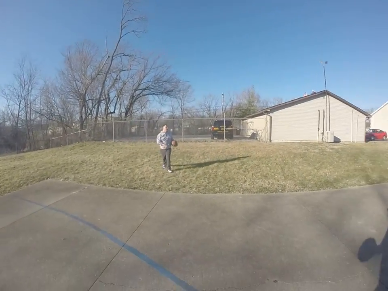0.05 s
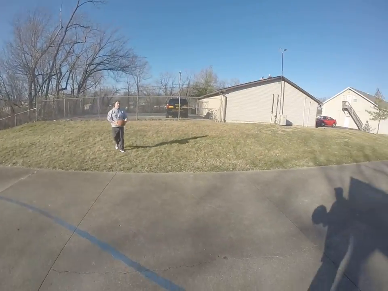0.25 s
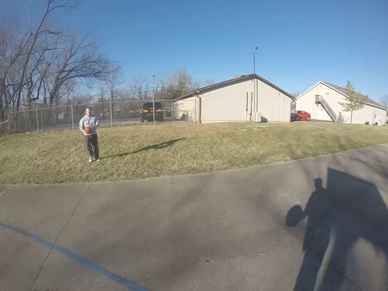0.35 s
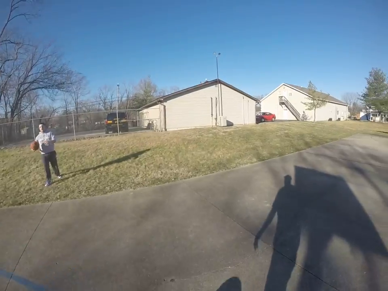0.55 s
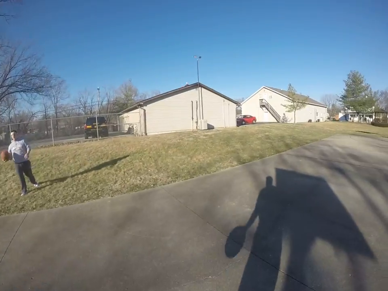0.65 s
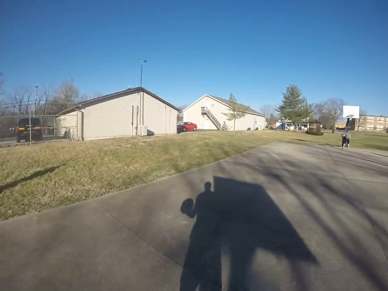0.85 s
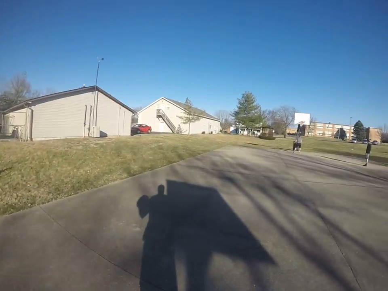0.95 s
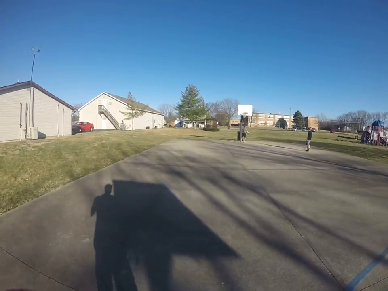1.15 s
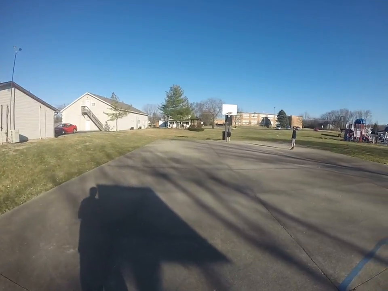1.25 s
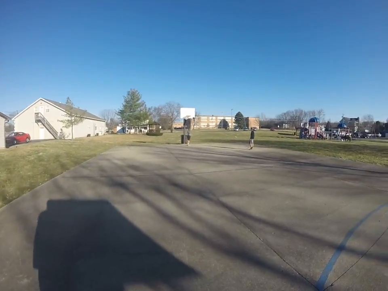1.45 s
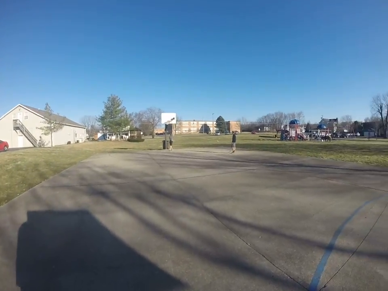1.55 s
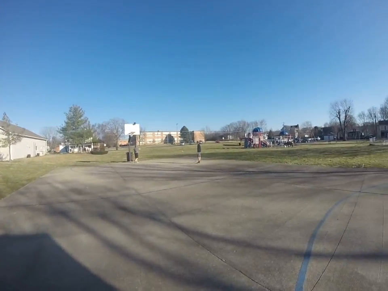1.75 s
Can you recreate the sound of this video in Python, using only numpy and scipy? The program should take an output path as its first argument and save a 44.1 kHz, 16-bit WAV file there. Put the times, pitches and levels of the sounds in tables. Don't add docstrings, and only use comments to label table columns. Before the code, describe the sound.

A basketball bounces twice on an outdoor paved court, with dull handling bumps and low wind.

```python
import sys
import numpy as np
from scipy import signal
from scipy.io import wavfile

SR = 44100
rng = np.random.default_rng(int(sys.argv[2]) if len(sys.argv) > 2 else 0)


def wav_record(signal):
    frames = np.transpose(np.atleast_2d(signal))
    bounded = np.clip(frames, -1, 1)
    quanta = np.round(bounded * 32767).astype(np.int16)
    wavfile.write(sys.argv[1], SR, quanta)


def field_ratio(decibels):
    return 10 ** (np.asarray(decibels, dtype=float) / 20)


N = 79380


def since(start_s):
    return np.maximum(np.arange(N) / SR - start_s, 0)


def ring(start_s, db, hz, t60_s, rise_cycles):
    t = since(start_s)
    rise = 1 - np.exp(-(t * hz / rise_cycles) ** 2)
    return field_ratio(db - 60 * t / t60_s) * np.sin(2 * np.pi * hz * t) * rise


def rms_one(x):
    return x / np.sqrt(np.mean(x ** 2) + 1e-20)


def noise_at(hz, octaves):
    edges_hz = np.clip(hz * 2 ** (np.array([-.5, .5]) * octaves), 20, 19000)
    sos = signal.butter(3, edges_hz, "band", fs=SR, output="sos")
    return rms_one(signal.sosfilt(sos, rng.standard_normal(N)))


def drift(rate_hz):
    pole = np.exp(-80 * np.pi * rate_hz / SR)
    white = rng.standard_normal(N // 40 + 2002)
    slow = signal.lfilter([1], [1, -2 * pole, pole * pole], white)[2000:]
    return np.interp(np.arange(N) / 40, np.arange(len(slow)), rms_one(slow))


def bands(noise_rows, low_hz, high_hz, per_octave):
    edges_hz = low_hz * 2 ** np.arange(0, np.log2(high_hz / low_hz) + .01, 1 / per_octave)
    for k, (a, b) in enumerate(zip(edges_hz, edges_hz[1:])):
        sos = signal.butter(2, [a, b], "band", fs=SR, output="sos")
        yield np.sqrt(a * b), signal.sosfilt(sos, noise_rows[k % 2])


def coloured(spectrum, low_hz, high_hz, shared_db, own_db, rate_hz):
    hz, db = np.transpose(spectrum)
    settle = 8000
    out, together = 0, drift(rate_hz / 4)
    for centre_hz, band in bands(rng.standard_normal((2, N + settle)), low_hz, high_hz, 4):
        level_db = np.interp(np.log(centre_hz), np.log(hz), db)
        flicker_db = shared_db * together + own_db * drift(rate_hz)
        out = out + field_ratio(level_db + flicker_db) * band[settle:]
    return rms_one(out)


def puffs(rows):
    out = 0
    for start_s, db, length_s, hz, octaves in rows:
        u = 3 * since(start_s) / length_s
        shape = u * np.exp(1 - u)
        puff = shape * noise_at(hz, octaves)
        out = out + field_ratio(db) * puff * np.sqrt(np.sum(shape ** 2) / np.sum(puff ** 2))
    return out


def bounce(k):
    # (time [s], level [dB], contact [s], lift-off kick [dB])
    bounce_rows = [
        (0.6094, -1.5, 0.0109, -4),
        (1.498, -1, 0.01067, -3),
    ]
    touch_s, db, contact_s, kick_db = bounce_rows[k]
    hit_s = touch_s + 0.00018
    out = ground_slap(touch_s, hit_s) + thump(k, hit_s, contact_s)
    out = out + ball_modes(k, hit_s, contact_s, kick_db) + skin_fold(k, hit_s)
    out = out + housing_ring(k, hit_s) + cavity(k, hit_s, contact_s)
    out = out + lift_snap(k, hit_s, contact_s) + tails(k, hit_s)
    return field_ratio(db) * out


def ground_slap(touch_s, hit_s):
    slap_hz = 2350 / 2
    return ring(hit_s, -8.5, slap_hz, 0.0048, 0.092) - ring(touch_s, -7.5, slap_hz, 0.0023, 0.18)


def thump(k, hit_s, contact_s):
    start_hz, end_hz, sag_s = (265, 279)[k], 96.4, 0.0028
    release_s, attack_s = 0.0016, 0.00086
    t = since(hit_s)
    turns = end_hz * t + (start_hz - end_hz) * sag_s * (1 - np.exp(-t / sag_s))
    release = np.exp(-(since(hit_s + contact_s - .0013) / release_s) ** 2)
    attack = 1 - np.exp(-(t / attack_s) ** 2)
    return field_ratio(-4.5) * np.sin(2 * np.pi * turns) * release * attack


def ball_modes(k, hit_s, contact_s, kick_db):
    # (pitch [Hz], first bounce [dB], second bounce [dB], lift-off [dB], t60 [s])
    ball_rows = [(441, -2, -7.5, 0, 0.019), (644, -11, -6, -21, 0.041), (722, -28, -16.5, -20.5, 0.052),
                 (895, -1, -13.5, -25, 0.014), (1390, -27, -19.5, -27, 0.025),
                 (2144, -5.5, -13.5, -25.5, 0.0078), (3130, -45, -38, -34, 0.0056)]
    lift_s = hit_s + contact_s - .0008
    out = 0
    for hz, *hit_db, lift_db, t60_s in ball_rows:
        out = out + ring(hit_s, hit_db[k], hz, t60_s, 0.2)
        out = out - ring(lift_s, lift_db + kick_db, hz, t60_s, 0.17)
    return out


def skin_fold(k, hit_s):
    # (pitch [Hz], first bounce [dB], second bounce [dB], t60 [s])
    fold_rows = [(403, -2.5, 2, 0.027), (534, 1, -49, 0.016), (625, -26, -15, 0.1), (840, -38, -4.5, 0.017)]
    delay_s, fold_db = (0.002977, 0.002515)[k], (-3, -8)[k]
    return -sum(ring(hit_s + delay_s, db[k] + fold_db, hz, t60_s, 0.11) for hz, *db, t60_s in fold_rows)


def housing_ring(k, hit_s):
    # (pitch [Hz], first bounce [dB], second bounce [dB], t60 [s])
    housing_rows = [(2033, -12, -58, 0.024), (2267, -16, -43, 0.014), (3076, -15, -13.5, 0.01),
                    (3200, -17, -20.5, 0.01), (3530, -23, -26, 0.042), (4990, -47, -12.5, 0.016),
                    (5520, -21, -16, 0.026), (6120, -27, -16.5, 0.016), (6560, -33.5, -24.5, 0.015),
                    (7110, -37, -42, .01), (8000, -34.5, -34, 0.011), (9300, -36, -43, 0.01),
                    (12800, -58, -57, .005)]
    hold_s, steepness = (0.0037, 0.0023)[k], (3.3, 2.6)[k]
    t = since(hit_s)
    out = 0
    for hz, *db, t60_s in housing_rows:
        haste = max(hz / 6200, 1) ** 1.6
        damping = np.exp(-(t / hold_s * haste) ** steepness)
        out = out + ring(hit_s - .0002, db[k], hz, 2 * t60_s, 1.0) * damping
    return out


def cavity(k, hit_s, contact_s):
    # (pitch [Hz], first bounce [dB], second bounce [dB], t60 [s])
    cavity_rows = [(1050, -46, -40, .14), (2750, -44, -56, .2), (3250, -56, -47, .2), (5300, -66, -65, .2),
                   (6300, -65, -65, .2), (6850, -67, -65, .2)]
    on = since(hit_s) > contact_s
    t = since(hit_s + contact_s)
    return sum(on * field_ratio(db[k] - 60 * t / t60_s) * noise_at(hz, .05) for hz, *db, t60_s in cavity_rows)


def lift_snap(k, hit_s, contact_s):
    return -ring(hit_s + contact_s - .0009, (-14, -19)[k], 2160, 0.0053, 0.95)


def tails(k, hit_s):
    t = since(hit_s)
    middle_db = (-38, -39)[k] - 60 * t / 0.084 + 5.8 * drift(60.0)
    bright_db = (-41, -49)[k] - 60 * t / (0.083, 0.18)[k] + 1.6 * drift(60.0)
    low_db = -45 - 60 * t / 0.19
    out = field_ratio(middle_db) * noise_at(2850, 1500 / 2850 * 2.05)
    out = out + field_ratio(bright_db) * noise_at(5420.0, 0.56) + field_ratio(low_db) * noise_at(855, 0.94)
    return (t > 0) * out


def hand():
    # (pitch [Hz], level [dB], t60 [s])
    hand_rows = [(530, -18, 0.014), (950, -55, .012), (1510, -19, 0.012), (2250, -19, 0.01),
                 (2570, -12, 0.0047), (3000, -15, 0.0082), (3860, -26.5, 0.0092), (4270, -42, 0.0071),
                 (5700, -37, 0.0084), (7050, -46, 0.011)]
    hand_s, hold_s = .4231, 0.0042
    damping = np.exp(-(since(hand_s) / hold_s) ** 3)
    return damping * sum(ring(hand_s, db, hz, t60_s, 0.4) for hz, db, t60_s in hand_rows)


def through_seal(x):
    dip_share = 0.97
    dipped = signal.lfilter(*signal.iirnotch(4620, 2.22, fs=SR), x)
    sos = signal.butter(2, 9000, fs=SR, output="sos")
    return signal.sosfilt(sos, dip_share * dipped + (1 - dip_share) * x)


def knocks():
    # (time [s], level [dB], pitch [Hz], t60 [s])
    knock_rows = [(0.4333, -15, 757, 0.011), (.4355, -14, 580, 0.011), (0.435, -30, 1760, .008),
                  (0.467, -17.5, 105, 0.077), (1.1314, -12.5, 630, 0.0098), (1.132, -36, 384, 0.0071)]
    return sum(ring(*row, 0.44) for row in knock_rows)


def bumps():
    # (time [s], level [dB], pitch [Hz], t60 [s])
    bump_rows = [(0.229, -7, 40.6, 0.038), (0.273, -2, 70, 0.024), (0.301, -12.5, 49, 0.078),
                 (0.325, -13.5, 45, 0.063), (0.348, -15.5, 115, 0.044), (0.366, -25, 157, 0.058),
                 (.385, -19, 137.5, 0.084), (.407, -7, 70.5, 0.022), (0.425, -11.5, 94, 0.038),
                 (0.844, -22.5, 38.7, 0.22), (0.911, -33.5, 84.6, 0.26), (1.362, -53, 89, 0.03),
                 (1.526, -30.5, 98.4, 0.32), (1.55, -39, 111, 0.11), (1.577, -16.5, 65, 0.048),
                 (1.648, -32, 80, 0.094)]
    return -sum(ring(*row, 0.19) for row in bump_rows)


def scuffs():
    # (time [s], level [dB], length [s], centre [Hz], width [octaves])
    scuff_rows = [(0.036, -55, 0.0057, 3000, 0.52), (0.19, -65, 0.0065, 9800, 0.41),
                  (.184, -60, 0.0072, 6500, 0.24), (.198, -63.5, 0.0055, 9900, 0.43),
                  (0.199, -53.5, 0.0064, 3200, 0.73), (.279, -57, .004, 5500, 0.51),
                  (.434, -37.5, 0.0067, 2330, 1), (0.4678, -39, 0.005, 2560, 0.49),
                  (.475, -59, 0.0035, 5470, 1.2), (0.479, -50, 0.0065, 2380, 0.44),
                  (0.483, -67, .008, 5950, 0.76), (0.686, -48, 0.013, 2600, 0.55),
                  (0.913, -57.5, 0.012, 5140, 0.21), (0.922, -67, 0.0055, 8000, 1.1),
                  (1.105, -31, 0.008, 782, 0.13), (1.1072, -51, 0.0051, 2540, 1),
                  (1.190, -49.5, 0.0076, 1810, 1.1), (1.353, -56, 0.0097, 5140, 0.65),
                  (1.357, -73, 0.011, 8500, .8), (1.574, -64, 0.004, 6500, 0.81),
                  (1.5832, -47, 0.0041, 4630, 0.94), (1.679, -47, 0.0067, 1700, 1.8)]
    return puffs(scuff_rows)


def rubs():
    # (time [s], level [dB], length [s], centre [Hz], width [octaves])
    rub_rows = [(.229, -36, 0.0099, 327, 0.44), (.277, -40, 0.013, 600, 0.75),
                (.292, -38, 0.0079, 650, 0.5), (.312, -31.5, .014, 380, 0.94),
                (.33, -34.5, 0.017, 423, 0.38), (.346, -41, 0.01, 367, 0.64), (.363, -42, 0.009, 647, 0.22),
                (.394, -43, 0.0068, 590, 0.43), (.427, -52, .012, 2510, 0.9), (.443, -59, 0.01, 2500, 0.41),
                (.457, -56, 0.012, 2300, 0.72), (.468, -43, 0.0088, 1150, 0.58),
                (.725, -50, 0.022, 764, .6), (.775, -42.5, 0.028, 756, 0.44),
                (.853, -37.5, 0.02, 407, 0.77), (.866, -42, 0.015, 776, 0.74),
                (1.099, -37, 0.006, 740, 0.51), (1.111, -49.5, 0.0061, 1280, 0.95),
                (1.145, -39, 0.0065, 720, 0.44), (.286, -35, 0.0079, 230, 0.5),
                (.322, -31, 0.0091, 240, 0.63), (.353, -28, 0.013, 218, 0.67),
                (.376, -44, 0.019, 296, 0.66), (1.106, -41, 0.017, 470, 0.91),
                (.436, -48, 0.0045, 3260, 0.67), (1.107, -58, .006, 5470, 0.6),
                (.30, -35, 0.021, 150, 0.55), (.337, -36.5, 0.023, 172, .7),
                (1.53, -60.5, 0.049, 5600, 0.37), (1.513, -54, 0.0041, 3000, .5),
                (1.521, -55, 0.0041, 3360, 0.85), (1.536, -52, .008, 3200, .4)]
    return puffs(rub_rows)


def wind():
    # (time [s], level [dB])
    gust_curve = [(0, -53.5), (.2, -42), (.24, -31.5), (.32, -26.5), (.39, -31), (.48, -35.5), (.58, -40),
                  (0.699, -36), (.82, -46.5), (.86, -38.5), (.93, -44.5), (1.2, -42.5), (1.37, -37),
                  (1.47, -40), (1.53, -40), (1.6, -42.5), (1.68, -47), (1.8, -48)]
    # (frequency [Hz], density [dB per Hz])
    wind_spectrum = [(15, -13), (40, 0), (90, -4), (170, -6.5), (350, -18.5), (700, -21.5), (1200, -71)]
    gust_db = np.interp(np.arange(N) / SR, *np.transpose(gust_curve))
    return field_ratio(gust_db) * coloured(wind_spectrum, 15, 1300, shared_db=1.5, own_db=2.0, rate_hz=25.0)


def hum():
    # (frequency [Hz], density [dB per Hz])
    hum_spectrum = [(25, -2), (85, 0), (200, -8), (450, -9.5), (780, -8.5), (1200, -26), (1900, -29.5),
                    (2900, -24)]
    # (time [s], level [dB])
    swell_curve = [(0, 1.5), (.15, 2), (.4, .5), (.75, 2), (.88, 0), (1.0, 0), (1.3, -1.5), (1.55, 2),
                   (1.8, 0.5)]
    swell_db = np.interp(np.arange(N) / SR, *np.transpose(swell_curve))
    return field_ratio(swell_db - 40) * coloured(hum_spectrum, 20, 2900, shared_db=.4, own_db=.9, rate_hz=20.0)


def hiss():
    # (frequency [Hz], density [dB per Hz])
    hiss_spectrum = [(2900, 0), (4000, -11.5), (4700, -7), (5600, -11.5), (6700, -17), (7500, -20),
                     (12500, -26.5), (15500, -49.5)]
    floor = field_ratio(-63) * coloured(hiss_spectrum, 2900, 17000, shared_db=.3, own_db=.9, rate_hz=20.0)
    port = field_ratio(-65 + 1.8 * drift(20.0)) * noise_at(2810, 0.16)
    ridge = field_ratio(-80) * noise_at(6500, 0.11)
    whistle = field_ratio(-72.5 + 2.0 * drift(26.0)) * noise_at(4713, 0.12)
    return floor + port + ridge + whistle


def scene():
    blows = through_seal(bounce(0) + bounce(1) + hand())
    contacts = knocks() + bumps() + scuffs() + rubs()
    return (blows + contacts + wind() + hum() + hiss())[None]


def band_limit(x):
    return signal.sosfilt(signal.butter(12, 15655, fs=SR, output="sos"), x)


def record(dry):
    mix = 1.414 * np.tanh(dry / 1.342)
    return band_limit(mix)


dry = scene()
out = record(dry)
wav_record(out)
```